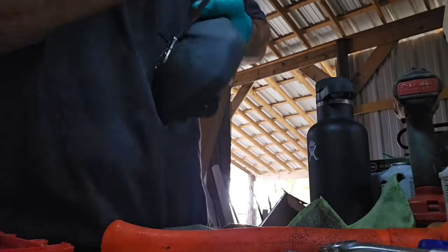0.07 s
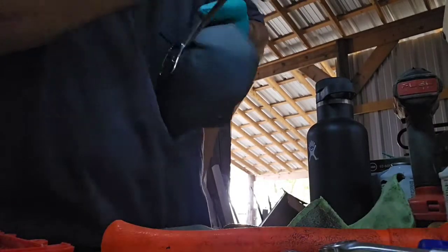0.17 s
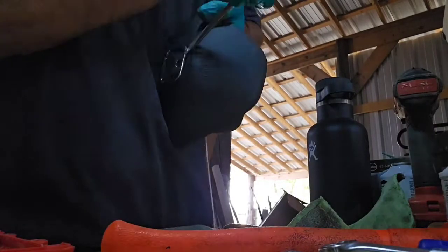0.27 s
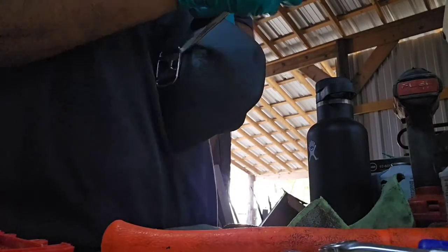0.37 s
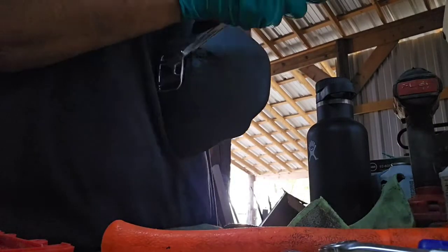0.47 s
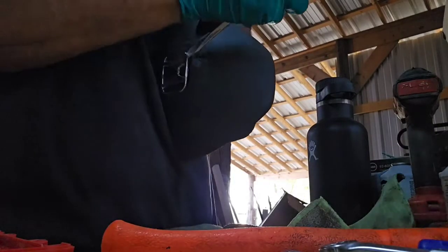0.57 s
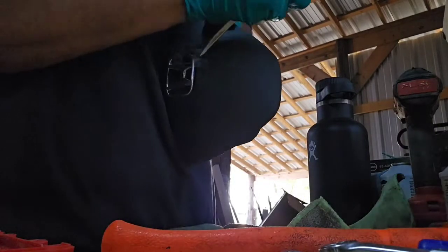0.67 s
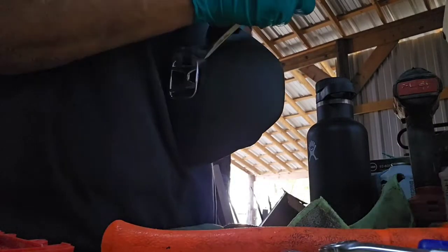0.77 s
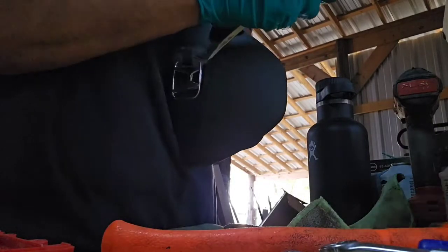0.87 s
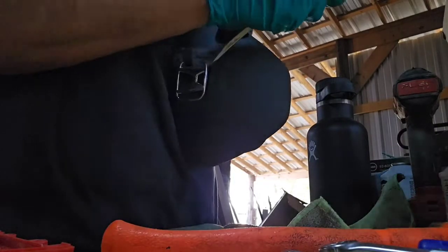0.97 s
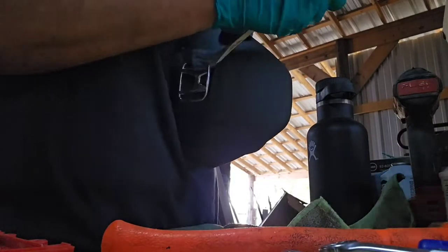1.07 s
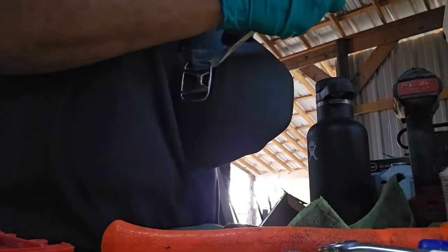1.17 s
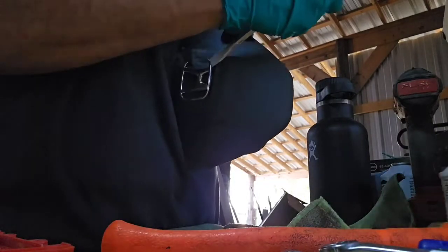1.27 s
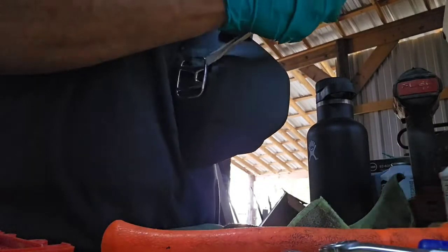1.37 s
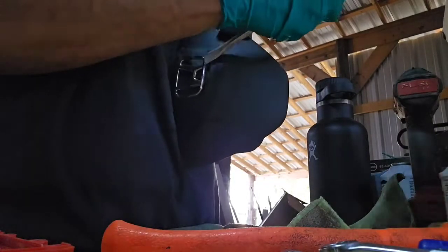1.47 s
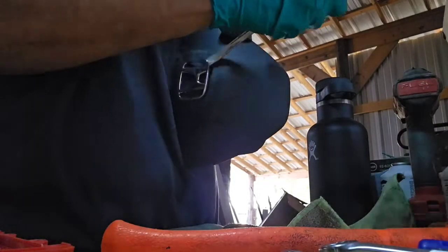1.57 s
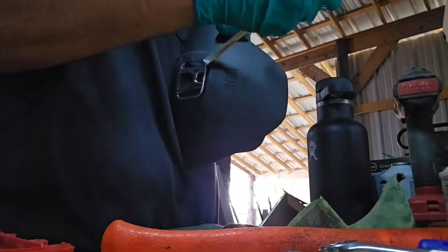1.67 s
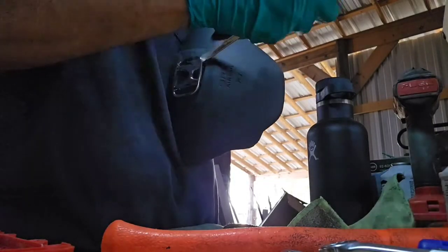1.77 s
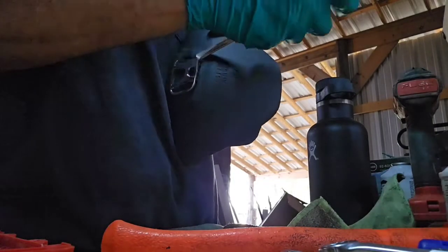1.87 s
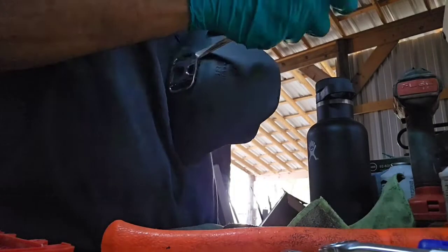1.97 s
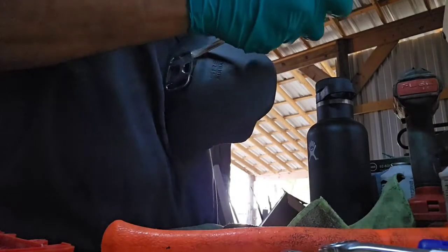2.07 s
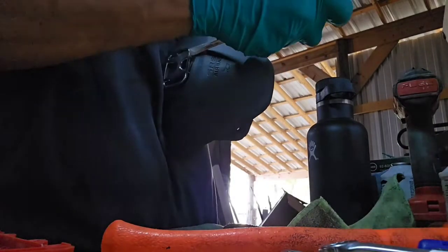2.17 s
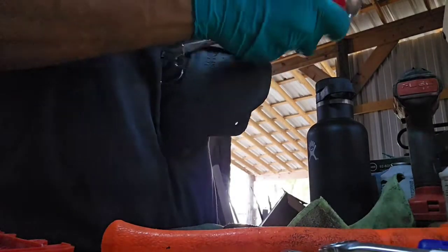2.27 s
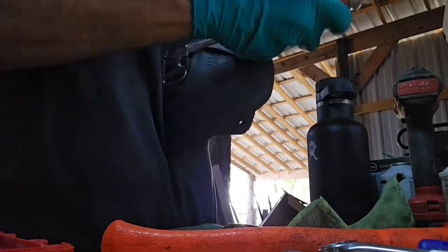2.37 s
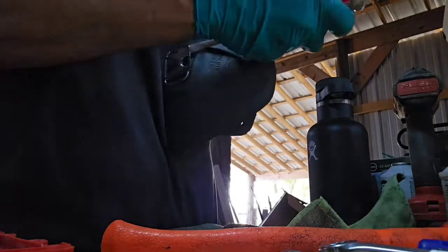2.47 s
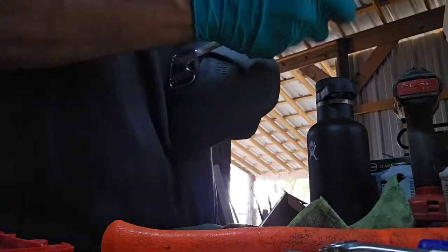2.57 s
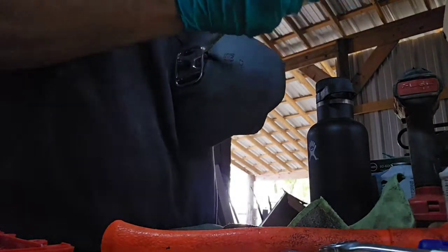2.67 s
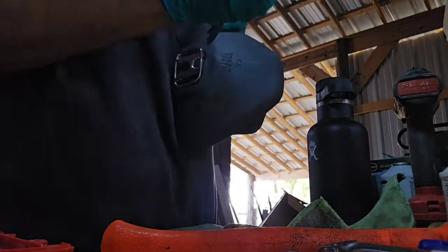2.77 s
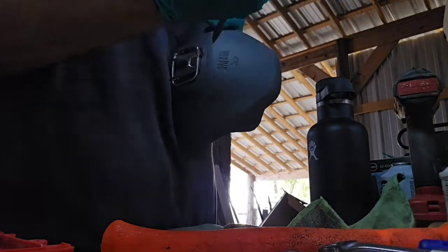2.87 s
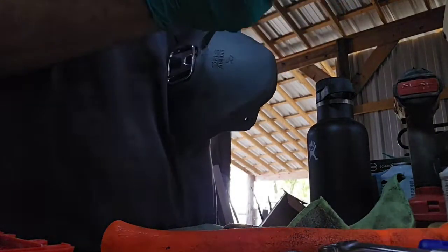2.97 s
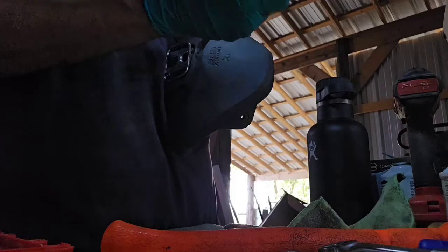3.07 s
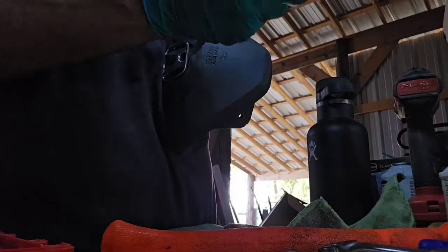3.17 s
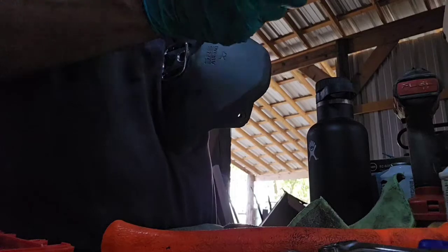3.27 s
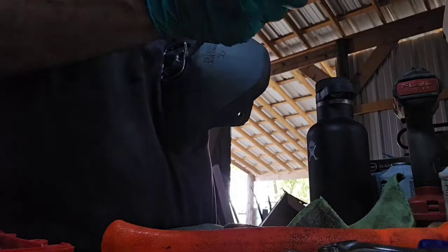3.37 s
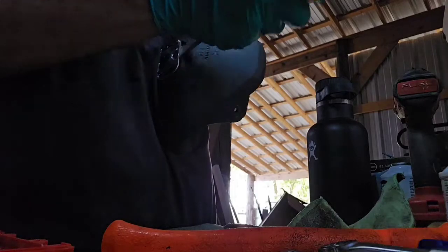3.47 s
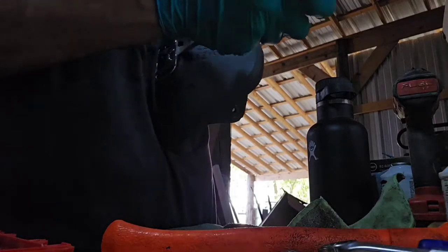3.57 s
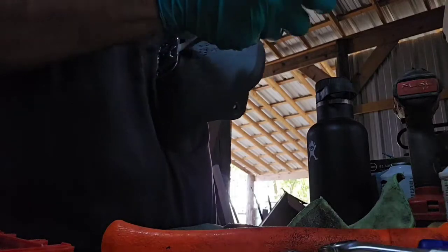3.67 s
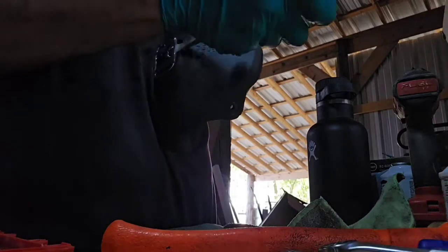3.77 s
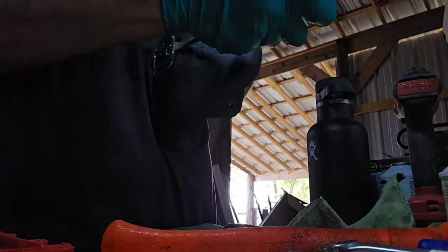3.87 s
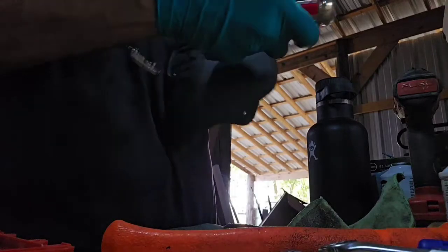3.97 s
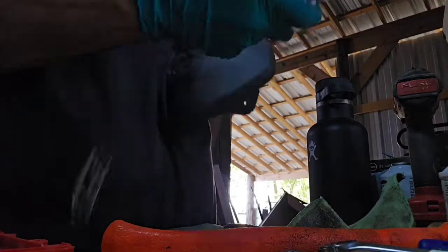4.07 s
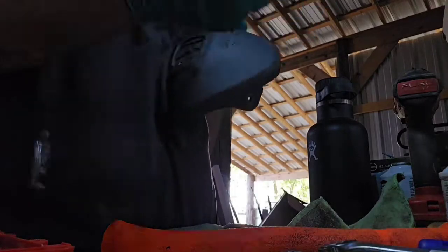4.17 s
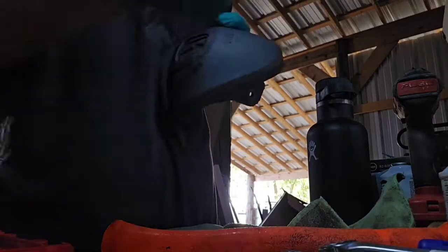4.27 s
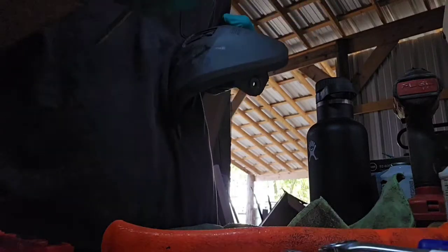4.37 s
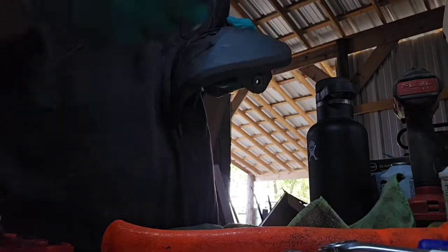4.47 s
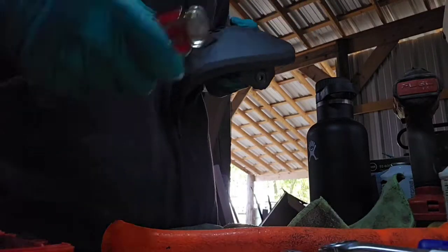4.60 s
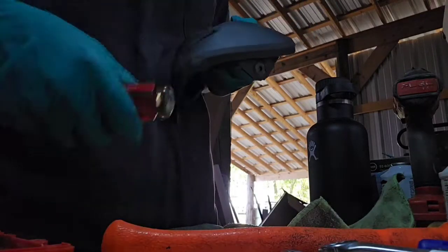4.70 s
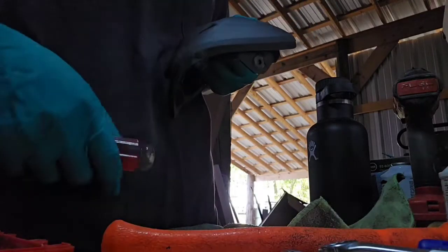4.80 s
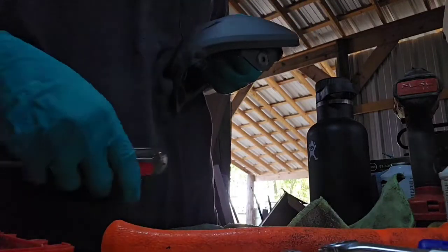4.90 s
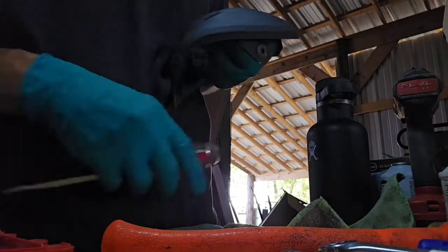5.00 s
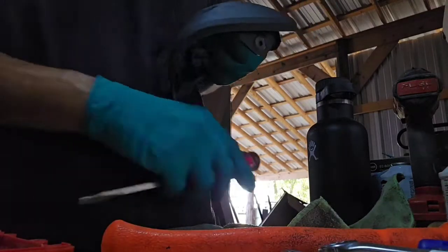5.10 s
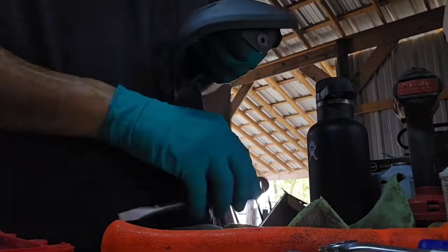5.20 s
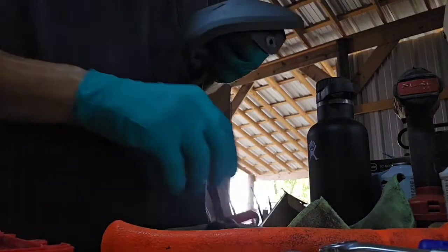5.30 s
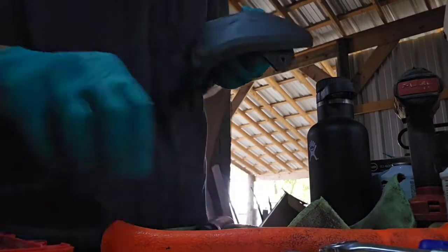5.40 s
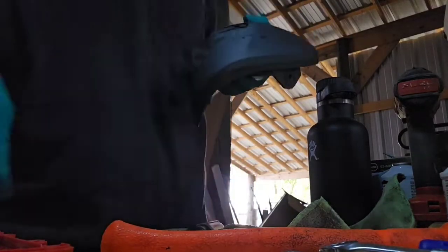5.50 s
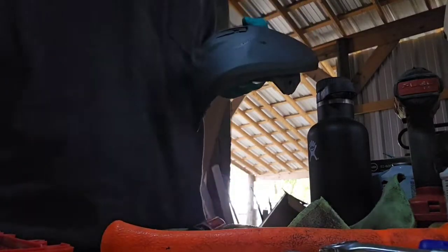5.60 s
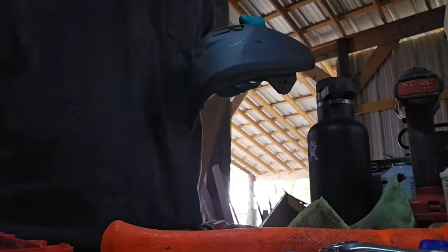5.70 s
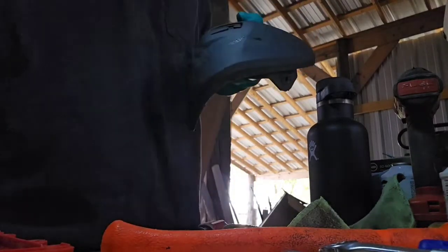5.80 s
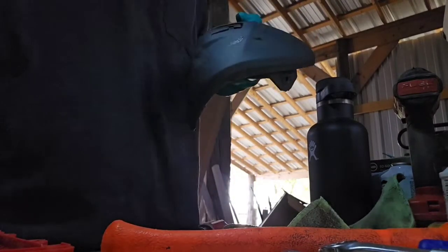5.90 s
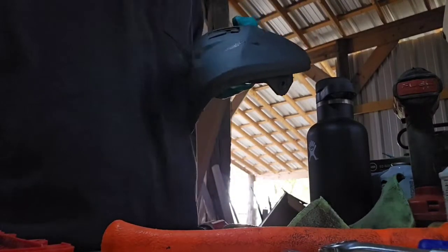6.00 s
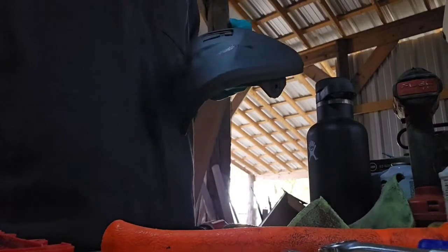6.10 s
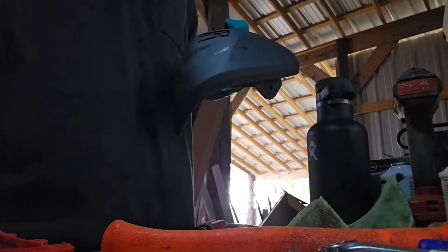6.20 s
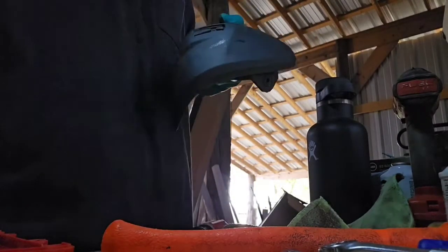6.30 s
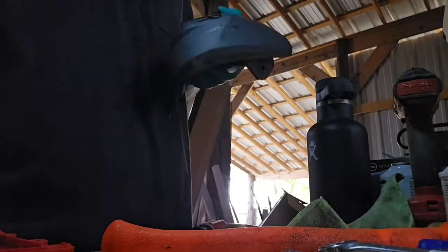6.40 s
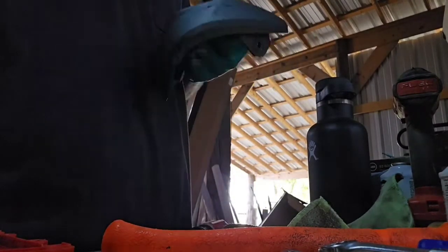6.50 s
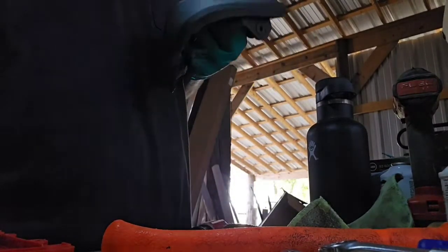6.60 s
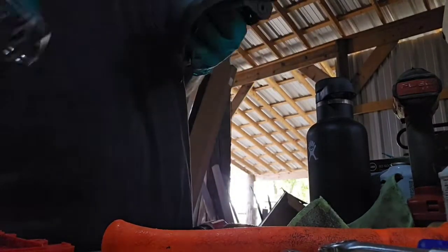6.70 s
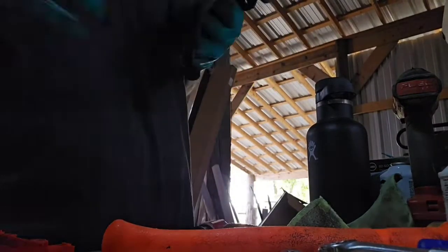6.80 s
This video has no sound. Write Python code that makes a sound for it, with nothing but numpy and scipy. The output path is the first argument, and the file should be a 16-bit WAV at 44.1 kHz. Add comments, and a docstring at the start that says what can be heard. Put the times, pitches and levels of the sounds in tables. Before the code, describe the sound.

Close by in an open shed, a glove slides softly over a plastic steering wheel cover, then a screwdriver pries at it with scattered clicks and short creaks. An emblem snaps free, drops and bounces to rest with a bright clatter. The tool lands on the bench with a low thump. Gloved hands rub and tick on the cover, and a catch clicks once. Birds peep faintly far away.

```python
"""A screwdriver levers a plastic emblem out of a steering wheel cover in an open shed; birds peep far away.
First a glove slides over the cover, then the blade clicks against it and creaks in stick-slip jerks.
Just before 4 s the emblem snaps free, drops and bounces to rest with a bright clatter.
At 5.2 s the tool is set down and the bench booms. Last, gloved hands turn the cover over:
they rub, sticky fingers tick off the rim, and a stiff catch clicks once."""
import sys
import numpy as np
from scipy import signal
from scipy.fft import rfft, irfft
from scipy.io import wavfile

SR = 44100
rng = np.random.default_rng(int(sys.argv[2]) if len(sys.argv) > 2 else 0)


def dump(signal):
    """Clip the signal to [-1, 1] and save it as 16-bit WAV at the path in sys.argv[1]."""
    limited = np.clip(np.atleast_2d(signal).T, -1, 1)
    pcm = np.round(limited * 32767).astype(np.int16)
    wavfile.write(sys.argv[1], SR, pcm)


N = 302085
TIME = np.arange(N) / SR


def from_db(db):
    """Decibels to gain."""
    return 10 ** (np.asarray(db) / 20)


def rms_one(x):
    """Scale to rms 1."""
    return x / np.sqrt(np.mean(x ** 2) + 1e-20)


def at_hz(points, hz):
    """Read a curve on a log-frequency axis."""
    f, value = np.transpose(points)
    return np.interp(np.log(np.maximum(hz, 1)), np.log(f), value)


def add(out, start, sound):
    """Mix a sound in at its start time in seconds."""
    i = max(round(start * SR), 0)
    out[:, i:i + sound.shape[-1]] += sound[:, :max(N - i, 0)]


def flutter(per_s):
    """Random modulation that glides to a new value per_s times a second."""
    steps = np.clip(rng.standard_normal(N // 20), -2, 2)
    return np.interp(TIME * per_s, np.arange(len(steps)), steps)


# stereo image of all noise: (frequency [Hz], left-right correlation [0-1])
CORRELATION = [(60, 0.92), (300, 0.74), (1000, 0.54), (3000, 0.04), (12000, .1)]

def noise(spectrum, size, pan=((1000, 0),)):
    """Coloured stereo noise at rms 1, narrow in the bass and wide in the treble."""
    hz, sides = np.fft.rfftfreq(size, 1 / SR), np.array([[1], [-1]])
    mid, side = rfft(rng.standard_normal((2, size)))
    alike = np.clip(at_hz(CORRELATION, hz), 0, 1)
    ears = np.sqrt(1 + alike) * mid + np.sqrt(1 - alike) * side * sides
    colour = from_db(at_hz(spectrum, hz) + sides * at_hz(pan, hz) / 2)
    return rms_one(irfft(ears * colour, size))


# attack noise of hard and of softer contacts: (frequency [Hz], level [dB])
HARD_CRACK = [(100, 9.5), (1200, -9.5), (3000, -7.5), (4600, -0.5), (5600, -7.5), (7500, -1.5),
              (9500, -12.5), (11500, -12.5), (15500, 1)]
SOFT_CRACK = [(100, 4.5), (2300, 7), (3600, -4), (7000, -7), (9800, -12.5), (15500, -5)]

def ringing(modes, crack_colour, pan, crack_db, crack_t60, rise_s, lag_s, size=9000, vary_db=3):
    """One contact: the body's modes, each at a fresh level, and a short crack of crowded modes."""
    t, sides = TIME[:size], np.array([1, -1])[:, None, None]
    hz, db, t60 = np.transpose(modes)[:, :, None]
    decay = from_db(db + vary_db * rng.standard_normal(hz.shape) - 60 * t / t60)
    polarity = (-1) ** np.arange(len(modes))[:, None]   # neighbouring modes swing in opposite senses
    balance = from_db(sides * at_hz(pan, hz) / 2)
    left_lag = np.clip(2 * np.pi * hz * lag_s, -1.8, 1.8)   # delay between the ears, in radians
    tones = polarity * decay * balance * np.sin(2 * np.pi * hz * t - sides * left_lag / 2)
    crack = from_db(crack_db - 60 * t / crack_t60) * noise(crack_colour, size, pan)
    return (tones.sum(axis=1) + crack) * (1 - np.exp(-t / rise_s))


# borders of five bands, thud, knock, clack, tick and sizzle: (frequency [Hz])
BAND_BORDERS = [60, 500, 1100, 3600, 9000, 16000]
# how much of a hit's edge and of its weight each band takes: (share [0-1])
EDGE_SHARE = [0, 0, 0, .8, 1]
WEIGHT_SHARE = [1, .8, 0, 0, 0]

def strike(hits, body, eq_db, lead_s=0.0011, reference_s=0.02):
    """Each hit rings the body: a sharp contact (edge) adds treble, a whole-body push (weight) bass."""
    out, hits = np.zeros((2, N)), np.array(hits)
    starts, level_db, touch = hits[:, 0], hits[:, 1:2], hits[:, 2:]
    shares = np.array([EDGE_SHARE, WEIGHT_SHARE])[:touch.shape[1]]
    band_db = level_db + eq_db + touch @ shares
    rings = np.array([body() for _ in hits])
    sounds = 0
    for k, borders in enumerate(zip(BAND_BORDERS, BAND_BORDERS[1:])):
        bandpass = signal.butter(2, borders, "band", fs=SR, output="sos")
        band = signal.sosfilt(np.vstack([bandpass, bandpass]), rings + 1e-18)
        energy = (band ** 2).mean(axis=1).sum(axis=1)
        gain = from_db(band_db[:, k]) / np.sqrt(energy / (reference_s * SR))
        sounds = sounds + band * gain[:, None, None]
    for start, sound in zip(starts, sounds):
        add(out, start - lead_s, sound)   # start each hit about a millisecond early so it peaks on time
    return out


# room tone: (frequency [Hz], level [dB])
AIR_COLOUR = [(15, -31), (25, -2), (80, 4), (153, -13), (242, -8), (373, -17), (641, -13), (1040, -26.5),
              (1790, -24.5), (2480, -30.5), (4610, -17.5), (5140, -30), (10100, -41.5), (11600, -29.5),
              (16000, -35)]

def still_air(level_db=-65.5):
    """A faint, steady bed of dark noise."""
    return from_db(level_db) * noise(AIR_COLOUR, N)


# bird calls: (time [s], pitch [Hz], level before gain_db [dB])
PEEPS = [(0.018, 4660, -68.5), (0.201, 4290, -69.5), (0.408, 4570, -69.5), (0.62, 4230, -74.5),
         (0.746, 4424, -68.5), (1.102, 4670, -68.5), (1.13, 4170, -73), (1.455, 4680, -68.5),
         (1.63, 4350, -64.5), (1.837, 4650, -64.5), (2.048, 4175, -67), (2.33, 4473, -68),
         (2.43, 4600, -65.5), (2.489, 4160, -70), (2.982, 4650, -71.5), (3.04, 4070, -83),
         (3.479, 4326, -66), (3.581, 4670, -71), (4.87, 4700, -73.5), (5.06, 4266, -69),
         (5.458, 4680, -70.5), (6.2, 4340, -70), (6.394, 4650, -66), (6.66, 4266, -75)]

def birds(peep_s=0.125, gain_db=3.0, arch=0.052, warble=0.014, flutter_db=6.5, scatter_t60=0.52):
    """Thin fluttering peeps, arched in pitch, smeared by many reflections on their long way."""
    out, t, age = np.zeros((2, N)), TIME[:SR // 4], TIME[:int(peep_s * SR)]
    swell = np.sin(np.pi * age / peep_s)
    knots = np.linspace(0, .25, 40)
    for start, hz, db in PEEPS:
        waver, throb = (np.interp(age, knots, steps) for steps in rng.standard_normal((2, len(knots))))
        pitch = hz * (1 + arch * (swell - .8) + warble * waver)
        envelope = np.sqrt(np.abs(swell)) * from_db(flutter_db * throb)
        call = envelope * np.sin(2 * np.pi * np.cumsum(pitch) / SR)
        scatter = rng.standard_normal((2, len(t))) * from_db(-60 * t / scatter_t60)
        far = signal.fftconvolve(call[None], scatter, axes=1)
        add(out, start, from_db(db + gain_db) * far / np.sqrt(np.sum(far ** 2) / (2 * len(call))))
    return out


# colour of the shed's reverb: (frequency [Hz], level [dB])
SHED_COLOUR = [(60, -1.5), (200, -5.5), (500, -2), (750, -6.5), (1050, -5), (2300, -0.5), (5000, -4.5),
               (15000, -11.5)]

def shed(x, near_db, near_t60, far_db, low_t60, high_t60, crossover_hz=1500, build_s=0.012):
    """Add quick reflections from the bench and body, then a faint tail from the metal roof."""
    t = TIME[:SR]
    echoes = noise(SHED_COLOUR, SR) * (1 - np.exp(-(t / build_s) ** 2))
    low = signal.sosfilt(signal.butter(3, crossover_hz, "low", fs=SR, output="sos"), echoes)
    high = signal.sosfilt(signal.butter(3, crossover_hz, "high", fs=SR, output="sos"), echoes)
    near = echoes * from_db(-60 * t / near_t60)
    far = low * from_db(-60 * t / low_t60) + high * from_db(-60 * t / high_t60)
    response = (from_db(near_db) * rms_one(near) + from_db(far_db) * rms_one(far)) / np.sqrt(SR)
    return x + signal.fftconvolve(x, response, axes=1)[:, :N]


# the dull and the bright layer of glove friction: (frequency [Hz], level [dB])
RUB_BODY = [(59, -34.5), (100, -6), (203, -4.5), (264, -5), (309, -23.5), (483, -7.5), (1040, -18),
            (1260, -17.5), (1910, -16), (2260, -17.5), (4000, -42), (5200, -59.5), (8800, -120)]
RUB_HISS = [(1470, -35), (2500, -16), (3230, -4), (3600, -11), (4880, -6), (5650, -15.5), (7300, -9),
            (9010, -18.5), (11800, -13), (16000, -17)]
# glove slides: (time [s], length [s], body level [dB], hiss level [dB], grain depth [dB])
GLOVE_STROKES = [(-0.02, 0.33, -59, -62.5, 1.5), (0.32, 0.38, -60.5, -77, 6), (0.853, 0.17, -77, -92, 7.5),
                 (4.458, 0.3, -53, -55.5, 2.5), (4.8, 0.28, -71, -72.5, 1), (5.655, 0.16, -62, -61, 7.5),
                 (5.764, 0.085, -55, -60.5, 4.5), (5.96, 0.34, -63, -62, 3), (6.63, 0.09, -79.5, -70, 4)]

def glove_rubs(grains_per_s=260, clumps_per_s=55, attack_s=0.028, sag_db_per_s=22.5, release_s=0.049):
    """Gloves slide over the cover: each stroke swells, sags and lets go, catching in clumps of grains."""
    body, hiss = 0, 0
    catching = flutter(grains_per_s) + flutter(clumps_per_s)
    for start, length, body_db, hiss_db, grain_db in GLOVE_STROKES:
        age = np.maximum(TIME - start, 0)
        gate = np.minimum(age / attack_s, 1) * np.exp(-np.maximum(age - length, 0) / release_s)
        friction = gate * from_db(grain_db * catching - sag_db_per_s * age)
        body += from_db(body_db) * friction
        hiss += from_db(hiss_db) * friction
    return body * noise(RUB_BODY, N) + hiss * noise(RUB_HISS, N)


# panning of the cover, its rim and its catch: (frequency [Hz], left minus right [dB])
COVER_PAN = [(300, -0.5), (1500, 2.5), (3000, 3.5), (6000, 2), (11000, 0.5), (15000, -0.5)]
# ring of the rim: (frequency [Hz], level [dB], t60 [s])
RIM_MODES = [(249, -5.5, 0.17), (505, -2.5, 0.058), (1310, 1.5, 0.028), (1796, 7, 0.017), (2710, -2, 0.016),
             (4080, 4, 0.017), (4990, 2.5, 0.017), (7500, -3, 0.016), (11600, 7, 0.016)]
# tone of a tick, thud to sizzle: (level [dB])
FINGER_EQ = [-3, -22, -4, -2.5, -6.5]
# fingers lifting off: (time [s], level [dB], edge [dB])
FINGER_TICKS = [(5.551, -65, 7.5), (5.707, -57, 6), (5.792, -51.5, 5.5), (5.801, -39.5, -28),
                (5.827, -45, -12), (5.848, -43, -10), (5.857, -63, -21), (5.927, -53, -7),
                (5.938, -50.5, -5.5), (6.002, -70, 22), (6.101, -56, -3), (6.194, -70, 12), (6.249, -64, 2),
                (6.342, -59, 2), (6.352, -59, 2.5), (6.451, -70, 18)]

def finger_ticks():
    """Sticky rubber fingers let go of the cover's rim with dry ticks."""
    def rim():
        return ringing(RIM_MODES, HARD_CRACK, COVER_PAN,
                       crack_db=6.0, crack_t60=0.045, rise_s=0.0015, lag_s=0.00022)
    return strike(FINGER_TICKS, rim, FINGER_EQ)


# ring of the catch: (frequency [Hz], level [dB], t60 [s])
CATCH_MODES = [(523, -29, 0.11), (1260, -6.5, 0.018), (1860, -8.5, 0.021), (2510, -2, 0.013),
               (3216, 4, 0.019), (4400, -11, 0.0088)]
# tone of the catch, thud to sizzle: (level [dB])
CATCH_EQ = [-17, -20.5, -2.5, -13, -30]
# its single click: (time [s], level [dB], edge [dB])
CATCH_CLICK = [(6.1225, -34.5, 2.5)]

def catch_click():
    """A small stiff plastic tab gives a biting click as the cover is turned over."""
    def tab():
        return ringing(CATCH_MODES, SOFT_CRACK, COVER_PAN,
                       crack_db=-0.5, crack_t60=0.018, rise_s=0.0014, lag_s=0.000088)
    return strike(CATCH_CLICK, tab, CATCH_EQ)


# boom of the bench top: (frequency [Hz], level [dB], t60 [s])
BENCH_MODES = [(95.1, -21, 0.32), (129, -4.5, 0.044), (157.6, -8, 0.13), (223.1, 4, 0.047),
               (375, -4.5, .04), (486, -3.5, 0.022), (692, -11.5, 0.041), (865, -10, 0.032),
               (1603, -31.5, .022), (2320, -16.5, 0.025), (4060, -15.5, 0.0162)]
# panning of the bench: (frequency [Hz], left minus right [dB])
BENCH_PAN = [(200, -0.5), (700, 0.5), (1400, 8.5), (2500, 3), (6000, 1.5), (12000, 1.5)]
# tone of the bench, thud to sizzle: (level [dB])
BENCH_EQ = [14, 4, -6, -16.5, -25]
# handle and shaft landing: (time [s], level [dB], edge [dB], weight [dB])
BENCH_HITS = [(5.222, -33.5, -6, 9.5), (5.2285, -48, 4, -7), (5.2355, -36, -9, -2.5),
              (5.243, -26.5, 1.5, -8.5), (5.354, -53, 5.5, 26.5), (5.394, -31.5, 0, -19.5)]

def tool_on_bench():
    """The bench top booms as the screwdriver is set down."""
    def bench():
        return ringing(BENCH_MODES, SOFT_CRACK, BENCH_PAN,
                       crack_db=-14.5, crack_t60=0.026, rise_s=0.00037, lag_s=-0.000041)
    return strike(BENCH_HITS, bench, BENCH_EQ)


# hollow knock of the padded cover: (frequency [Hz], level [dB], t60 [s])
COVER_MODES = [(108, -23, 0.03), (256, -16, 0.022), (809, -2, .028), (1068, -10, 0.012), (1275, -3, .022),
               (1740, -12, 0.02), (2044, -9.5, .018), (2510, -16, 0.015), (2860, -21, 0.024),
               (5000, -24.5, 0.0065), (6350, -27, .012), (7280, -25, 0.013), (13300, -25, 0.012)]
# creaks: (start [s], end [s], first rate [slips/s], last rate [slips/s], first level [dB], last level [dB])
CREAKS = [(0.326, 0.345, 112, 370, -53, -49.5), (1.451, 1.487, 220, 370, -50, -53),
          (1.712, 1.781, 190, 300, -52.5, -45), (2.111, 2.173, 45, 53, -56, -47.5),
          (2.56, 2.665, 220, 430, -53.5, -39.5), (3.196, 3.284, 82, 47, -58.5, -71.5),
          (3.379, 3.443, 118, 460, -43, -32.5)]

def blade_creaks(jitter=0.31, grit_db=-12, vary_db=2, max_slips=50):
    """The blade sticks and slips, mostly speeding up as the push grows; each jerk knocks the cover."""
    out = np.zeros((2, N))
    for start, end, first_rate, last_rate, first_db, last_db in CREAKS:
        now = start
        for delay, force in rng.standard_normal((max_slips, 2)):
            knock = ringing(COVER_MODES, SOFT_CRACK, COVER_PAN, crack_db=grit_db,
                            crack_t60=0.031, rise_s=0.0004, lag_s=-0.000055, size=1024)
            progress = (now - start) / (end - start)
            if progress < 1:
                rate = first_rate + (last_rate - first_rate) * progress
                level = from_db(first_db + (last_db - first_db) * progress + vary_db * force)
                add(out, now, level * knock * np.sqrt(2 * SR / rate / np.sum(knock ** 2)))
                now += np.exp(jitter * delay) / rate
    return out


# tone of the cover, thud to sizzle: (level [dB])
COVER_EQ = [-18.5, -1, -1.5, -17, -18.5]
# prying, up to the final snap: (time [s], level [dB], edge [dB], weight [dB])
PRY_CLICKS = [(0.351, -58, 14, -11), (0.362, -44.5, 8.5, -40), (0.697, -53.5, -3, -5),
              (0.734, -44.5, 11.5, -2), (0.816, -56.5, -7, -24), (0.916, -45, 12.5, 5),
              (1.087, -46.5, 6.5, 2), (1.211, -49, 6.5, 4.5), (1.43, -47, -8, 8), (1.446, -45, -17, 3.5),
              (1.461, -54.5, -17, 13.5), (1.4985, -39, -10, 1), (1.783, -56.5, -5, 8),
              (1.861, -57, 3, -10.5), (2.075, -43.5, 13, -2), (2.101, -50.5, -3, 3),
              (2.1686, -30.5, 9.5, 15.5), (2.524, -48.5, 6, -10), (2.6625, -52.5, -1.5, 10.5),
              (3.182, -48.5, -14, 1.5), (3.369, -59, 9.5, 0.5), (3.441, -47, 7.5, 16),
              (3.4468, -30.5, -4.5, -2.5), (3.833, -42.5, -2.5, 8), (3.839, -42.5, 7, 3),
              (3.852, -26.5, 6.5, -8), (3.8565, -25.5, -10, 1.5), (3.8655, -35.5, 7.5, -7)]

def blade_clicks(detune=0.028):
    """The blade knocks the cover; the load on the plastic shifts each mode a little from hit to hit."""
    def strained_cover():
        modes = np.array(COVER_MODES, float)
        modes[:, 0] *= 1 + detune * rng.standard_normal(len(modes))
        return ringing(modes, SOFT_CRACK, COVER_PAN,
                       crack_db=-14, crack_t60=0.018, rise_s=0.00057, lag_s=-0.000053)
    return strike(PRY_CLICKS, strained_cover, COVER_EQ)


# ring of the emblem and of what it lands on: (frequency [Hz], level [dB], t60 [s])
EMBLEM_MODES = [(4078, -3, .055), (4812, 4, .035), (5020, 3, .037), (6020, -10, .025), (6450, -6, .03),
                (7550, 2, .03), (8400, -7, .022), (10965, -5, .028), (11425, 2, .033), (12350, -4, .025),
                (14420, -3, .025), (15100, 4, .028), (15210, 3, .028), (15330, 1, .025)]
GROUND_MODES = [(100.86, -16.5, 0.0975), (172, -8.5, 0.048), (266, -9, 0.072), (440, -21, 0.0096),
                (486, -3.5, 0.048), (710, -1.5, 0.014), (893, -5, 0.027), (1309, -9.5, 0.036),
                (1730, -4, 0.0099), (2334, -12.5, 0.024), (2620, -4.5, 0.013), (3160, -6, 0.0083)]
# panning of the emblem: (frequency [Hz], left minus right [dB])
EMBLEM_PAN = [(300, 0.5), (1400, 3), (2500, 1), (4800, 1), (7000, 6), (10500, -10), (15000, 0)]
# tone of the emblem, thud to sizzle: (level [dB])
EMBLEM_EQ = [-2.5, -2.5, -5, -3, 1.5]
# landing, bounces and last rattle: (time [s], level [dB], edge [dB])
EMBLEM_HITS = [(4.0478, -24.5, 1), (4.274, -38.5, 11.5), (4.2925, -43, 9.5), (4.381, -46, 5),
               (4.412, -46.5, 1), (4.422, -45, 4), (4.433, -48, -18), (4.461, -43, 3.5), (4.512, -58, 5.5),
               (4.537, -54, 4), (4.551, -52.5, -14), (4.565, -58.5, 13), (4.635, -55.5, 9),
               (4.715, -49.5, -2.5), (4.775, -62.5, -2.5), (4.855, -62.5, -2)]

def emblem_drop():
    """The hard plated emblem clatters brightly and knocks what it lands on."""
    def emblem():
        return ringing(list(GROUND_MODES) + list(EMBLEM_MODES), HARD_CRACK, EMBLEM_PAN,
                       crack_db=14.5, crack_t60=0.024, rise_s=0.003, lag_s=0.000065)
    return strike(EMBLEM_HITS, emblem, EMBLEM_EQ)


def scene():
    """The work close by, in the shed's reverb, over far birds and still air."""
    prying = blade_clicks() + blade_creaks()
    drop = emblem_drop()
    handling = tool_on_bench() + finger_ticks() + glove_rubs()
    click = catch_click()
    # the drop, handling and catch have shorter bright tails than the prying; the catch is driest
    work = shed(drop, near_db=-17, near_t60=0.067, far_db=-25.5, low_t60=0.68, high_t60=0.39)
    work += shed(handling, near_db=-18.5, near_t60=0.084, far_db=-26, low_t60=0.65, high_t60=0.35)
    work += shed(click, near_db=-25.5, near_t60=0.08, far_db=-37, low_t60=0.76, high_t60=0.3)
    work += shed(prying, near_db=-20, near_t60=0.11, far_db=-27, low_t60=0.79, high_t60=0.54)
    return work + birds() + still_air()


def record(dry, ceiling=0.85, cutoff_hz=16100):
    """A soft clip rounds the highest peaks and a steep low-pass cuts the top."""
    rounded = dry / (1 + (dry / ceiling) ** 6) ** (1 / 6)
    return signal.sosfilt(signal.ellip(10, .1, 80, cutoff_hz, fs=SR, output="sos"), rounded)


dry = scene()
out = record(dry)
dump(out)
```